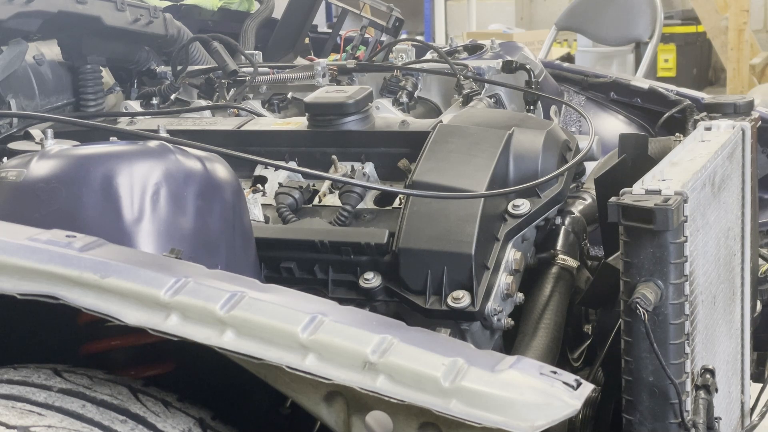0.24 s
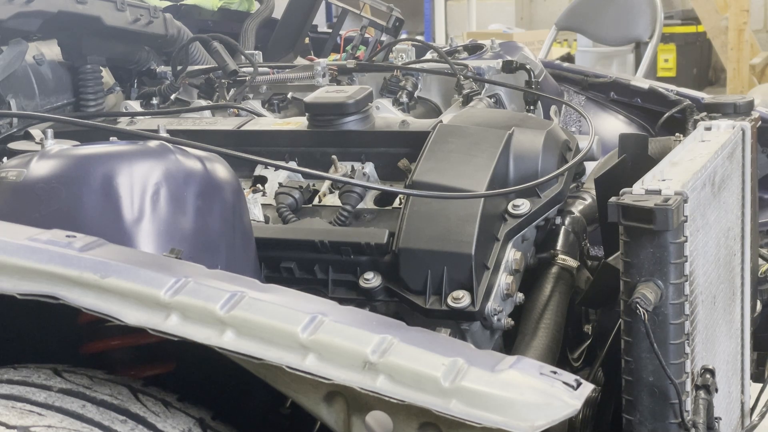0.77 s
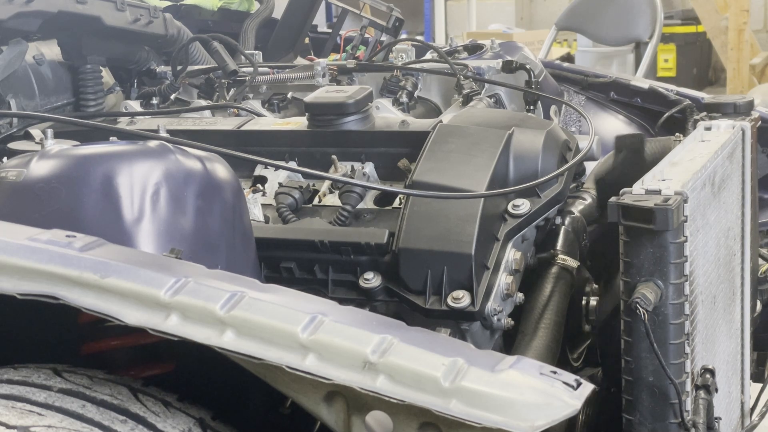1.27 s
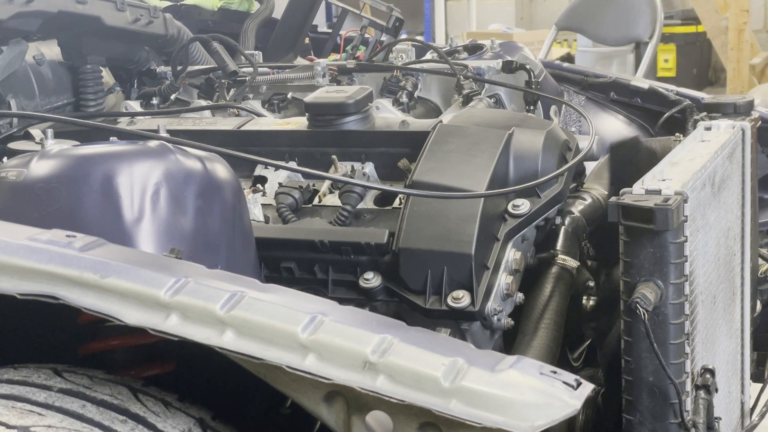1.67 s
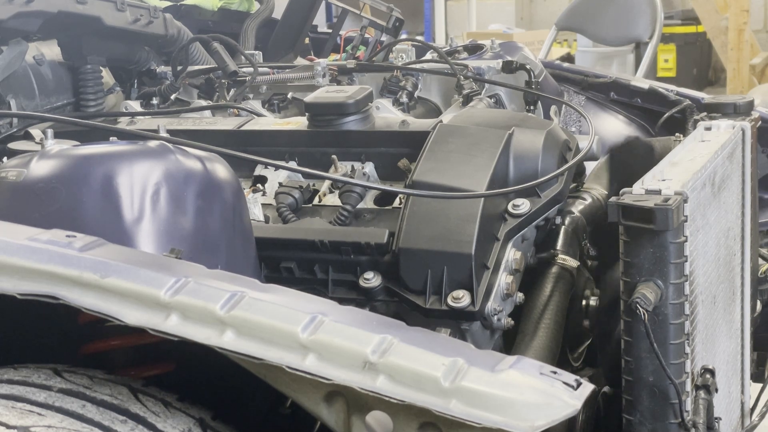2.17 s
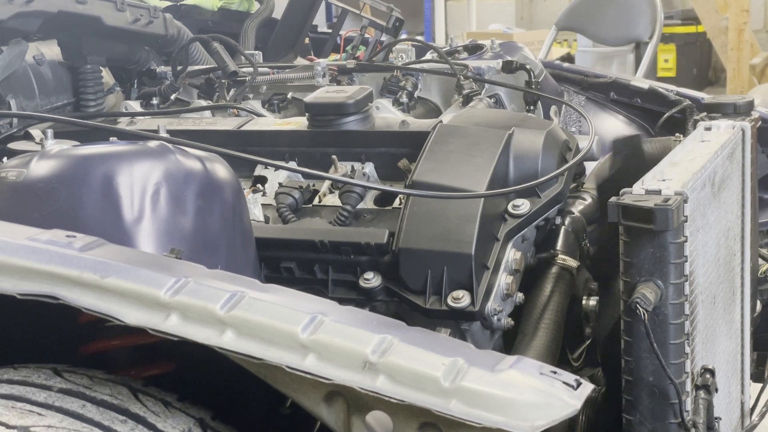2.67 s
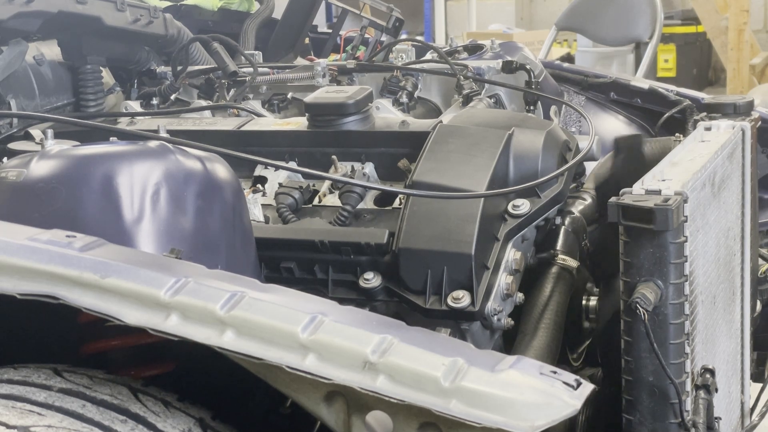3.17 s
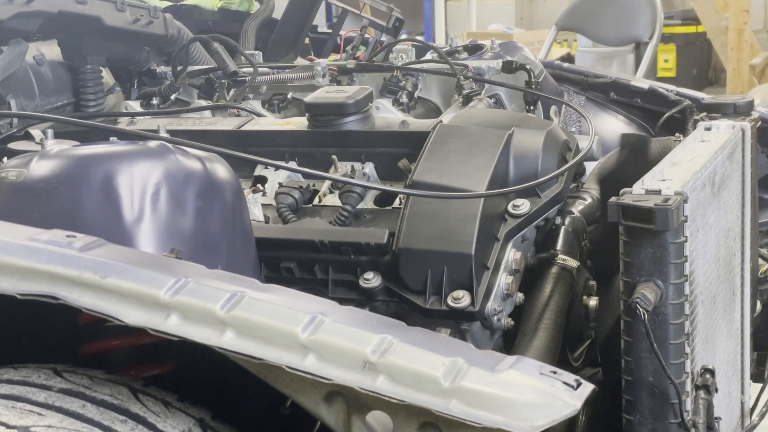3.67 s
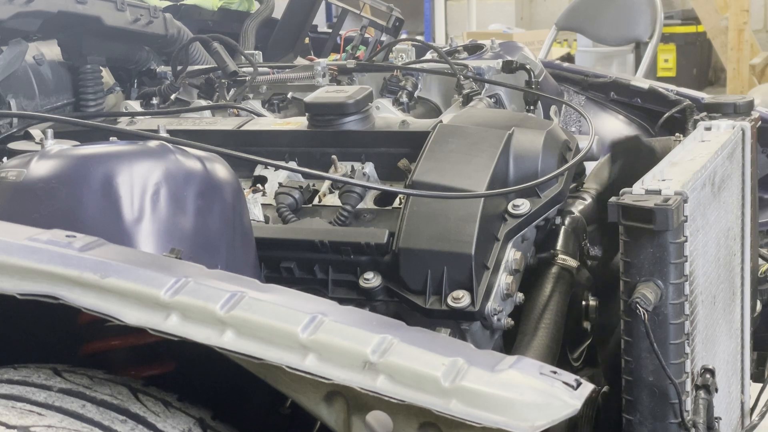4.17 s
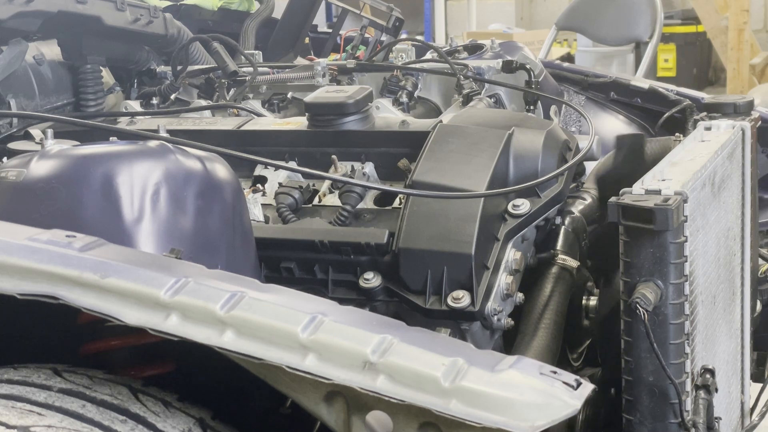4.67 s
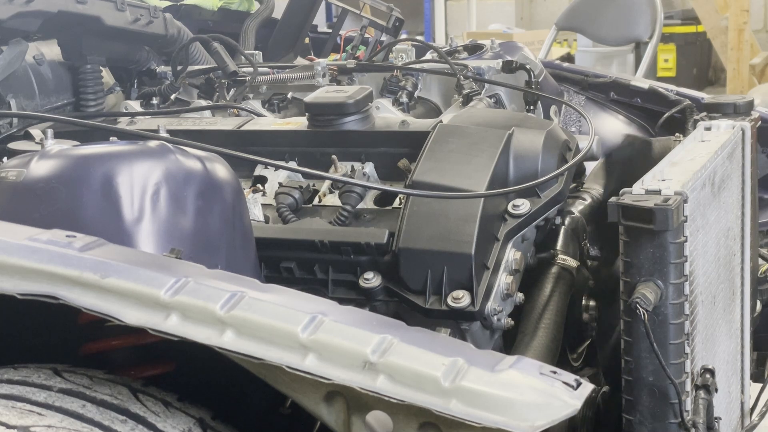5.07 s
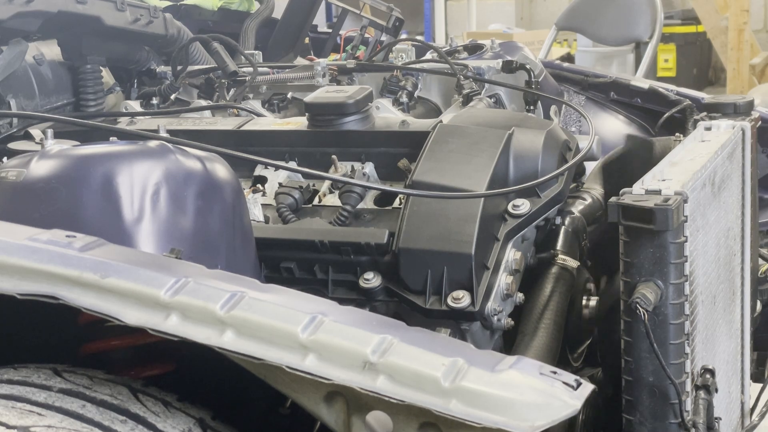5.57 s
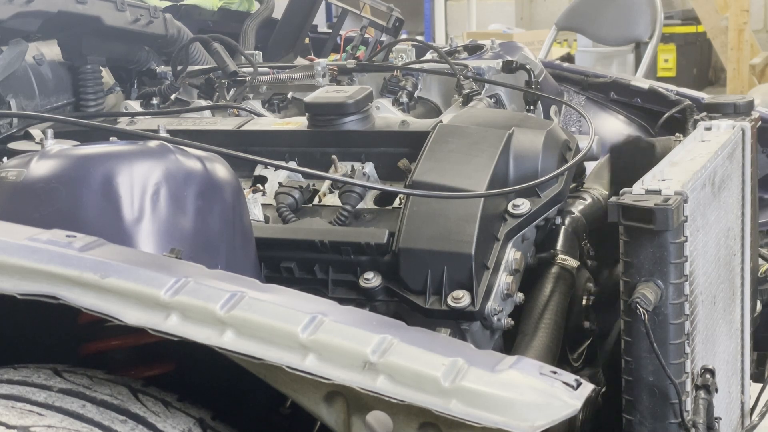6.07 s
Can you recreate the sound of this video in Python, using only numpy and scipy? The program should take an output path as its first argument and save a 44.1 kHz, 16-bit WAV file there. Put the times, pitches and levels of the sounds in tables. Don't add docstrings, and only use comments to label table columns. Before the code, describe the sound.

A fuel pump whirrs down, then a starter clunks in and cranks a car engine that never fires, with booming pulses and hollow metallic knocks.

```python
import sys
import numpy as np
from scipy import signal
from scipy.fft import rfft, irfft, next_fast_len
from scipy.io import wavfile
from scipy.ndimage import uniform_filter1d

SR = 44100
rng = np.random.default_rng(int(sys.argv[2]) if len(sys.argv) > 2 else 0)


def gain_from_decibels(decibels):
    exponent = np.asarray(decibels, float) / 20
    return 10 ** exponent


def to_wav(sig):
    pcm = np.clip(np.atleast_2d(sig), -1, 1) * 32767
    pcm = np.round(pcm).astype(np.int16)
    wavfile.write(sys.argv[1], SR, pcm.T)


N = 279153
T = np.arange(N) / SR
PADDED = next_fast_len(N + SR // 4)


def in_time(rows):
    s, *columns = np.transpose(rows)
    return [np.interp(T, s, c) for c in columns]


def rms_one(x):
    return x / np.sqrt(np.mean(x ** 2) + 1e-20)


def along_hz(points, size):
    hz = np.maximum(np.arange(size // 2 + 1) * SR / size, 1)
    point_hz, values = np.transpose(points)
    return np.interp(np.log(hz), np.log(np.maximum(point_hz, 1)), values)


def colour(x, points):
    return irfft(rfft(x, PADDED) * gain_from_decibels(along_hz(points, PADDED)), PADDED)[:N]


def drift(rate_hz):
    r = np.exp(-2 * np.pi * rate_hz / SR)
    return rms_one(signal.lfilter([1], [1, -2 * r, r * r], rng.standard_normal(N + SR))[SR:])


def resonate(x, hz, width_hz):
    r = np.exp(-np.pi * width_hz / SR)
    poles = [1, -2 * r * np.cos(2 * np.pi * hz / SR), r * r]
    return signal.lfilter(np.array([1, 0, -1]) * (1 - r * r) / 2, poles, x)


def band(x, low_hz, high_hz):
    return rms_one(signal.sosfilt(signal.butter(2, [low_hz, high_hz], "band", fs=SR, output="sos"), x))


def highpass(x, order, hz):
    return signal.sosfilt(signal.butter(order, hz, "high", fs=SR, output="sos"), x)


def pump_fade():
    off_s, t60_s = .25, .38
    return gain_from_decibels(-60 * np.maximum(T - off_s, 0) / t60_s)


def thud_swell(age_s):
    return np.minimum(age_s / .035, 1)


THUD_S = .206
AIR_DB, PUMP_AIR_DB, AIR_STIRRED_DB, AIR_RUNNING_DB = -68.5, -58, -52.5, -42
STIR_S = .15


def garage_air():
    rumble = gain_from_decibels(-62.5) * band(rng.standard_normal(N), 49, 95)
    age = np.maximum(T - THUD_S, 0)
    stirred = gain_from_decibels(AIR_STIRRED_DB) * thud_swell(age) * np.exp(-(age / STIR_S) ** 2)
    running = gain_from_decibels(AIR_RUNNING_DB) * (T > PINION_S)
    level = gain_from_decibels(AIR_DB) + gain_from_decibels(PUMP_AIR_DB) * pump_fade() + stirred + running
    return rumble + level * band(np.cumsum(rng.standard_normal(N)), 95, 1500)


# (frequency [Hz], width [Hz], level [dB])
PUMP_MODES = [(1250, 340, -16), (1820, 200, -12), (2860, 360, -8), (4150, 1100, -18), (6550, 380, -16)]
PUMP_DB, HISS_DB = -58.5, -83


def fuel_pump():
    flow = rng.standard_normal(N)
    whirr = sum(gain_from_decibels(db) * resonate(flow, hz, width) for hz, width, db in PUMP_MODES)
    whirr = whirr + .086 * colour(flow, SLAM_COLOUR)
    level = gain_from_decibels(PUMP_DB) * pump_fade() + gain_from_decibels(HISS_DB)
    return level * gain_from_decibels(1.4 * drift(30)) * rms_one(whirr)


def key_tick():
    start_s, level_db, t60_s = .189, -50, .17
    fade = gain_from_decibels(level_db - 60 * np.maximum(T - start_s, 0) / t60_s) * (T > start_s)
    return fade * band(rng.standard_normal(N), 4000, 16000)


# (frequency [Hz], level [dB], t60 [s])
THUD_MODES = [(82, -35, 0.62), (115, -25, 0.082), (174, -33, 0.21), (262, -37, 0.19), (330, -53, .12),
              (570, -58, .1), (620, -53, 0.36)]


def thud():
    age = np.maximum(T - THUD_S, 0)
    modes = sum(gain_from_decibels(db - 60 * age / t60) * np.sin(2 * np.pi * hz * age) for hz, db, t60 in THUD_MODES)
    return thud_swell(age) * modes


# (time [s], level [dB], t60 [s])
SLAM = [
    (1.066, -50.5, 0.35),
    (1.1075, -9, 0.044),
    (1.109, -16.5, 0.54),
    (.191, -66, .06),
]
PINION_S = SLAM[1][0]
# (frequency [Hz], level [dB])
SLAM_COLOUR = [(40, -55), (100, -19), (400, -1.5), (1400, -2), (2700, 3.5), (5500, -8.5), (8000, -0.5),
               (12000, -6.5), (16000, -11)]
# (frequency [Hz], width [Hz], level [dB])
SLAM_RING = [(1380, 120, 16), (2500, 200, 2), (3400, 160, -11), (5600, 800, 5.5)]


def engagement():
    burst = 0
    for s, level_db, t60 in SLAM:
        attack = np.clip((T - s) / .003, 0, 1)
        burst = burst + gain_from_decibels(level_db - 60 * np.maximum(T - s, 0) / t60) * attack
    crash = highpass(burst * rms_one(colour(rng.standard_normal(N), SLAM_COLOUR)), 2, 120)
    return crash + sum(gain_from_decibels(db) * resonate(crash, hz, width) for hz, width, db in SLAM_RING)


def belts():
    return gain_from_decibels(-40) * (T > PINION_S) * band(rng.standard_normal(N), 5600, 16000)


TURNS = [1.182, 1.675, 2.085, 2.485, 2.878, 3.281, 3.69, 4.105, 4.512, 4.955, 5.38, 5.83, 6.29]
# (time [s], drive [dB], effort [dB], tooth rate [Hz])
STARTER = [(1.2, -36.5, -0.5, 301.8), (1.27, -28, 1, 301.5), (1.4, -25.5, -7, 300), (1.52, -30, 0, 238.2),
           (1.66, -28, -0.5, 278.9), (2.25, -27, -1, 268.6), (2.5, -28, 0, 281.6), (3.4, -29, 1, 278.7),
           (3.95, -29, 1, 261), (4.7, -27.5, -0.54, 256.3), (5.4, -28, -1, 245.6),
           (5.85, -30.5, 0.7, 251.6), (6.05, -20.5, -9, 266), (6.17, -29, -9, 278),
           (6.33, -41.5, -16.5, 250)]
# (effort [dB], speed [ratio])
CYLINDERS = [(-0.24, 1.002), (-0.52, .99), (-0.33, .995), (-0.27, 1.015), (-0.55, 1.005), (-0.3, .99)]


def crank():
    strokes = 3 * np.interp(T, TURNS, np.arange(len(TURNS)))
    drive_db, effort_db, tooth_hz = in_time(STARTER)
    cylinder = np.round(strokes).astype(int) % len(CYLINDERS)
    own_db, speed = uniform_filter1d(np.array(CYLINDERS)[cylinder].T, size=SR // 30, axis=1)
    return 2 * np.pi * strokes, drive_db, effort_db + own_db, tooth_hz * speed


SAG = .115
# (order of tooth rate, level [dB rms])
WHINE = [(1, -34.5), (2, -27), (3, -37), (4, -38), (5, -39), (6, -45), (8, -34), (11, -47)]
# (frequency [Hz], width [Hz], level [dB])
HOUSING = [(166.5, 21, -43.5), (250, 87, -34.5), (441.3, 15, -38), (567, 20, -34), (748.4, 28, -31.5),
           (872.5, 42, -32), (1089, 29, -37), (1532, 7.5, -39.5), (1579, 5.4, -44), (2077, 18, -39.5),
           (2208, 21, -39), (2786, 16, -40), (3160, 20, -43), (4000, 37, -48), (4400, 43, -72),
           (5460, 260, -45), (11300, 340, -55)]
# (frequency [Hz], density [dB per Hz])
HASH = [(70, -98), (100, -33.5), (130, -67.5), (250, -53), (500, -61), (800, -59), (1300, -60.5),
        (2000, -64), (3200, -65), (5000, -68.5), (7000, -72), (9000, -72), (12000, -77), (15500, -83)]


def starter():
    angle, drive_db, effort_db, mean_hz = crank()
    drive = gain_from_decibels(drive_db + 31) * (T > PINION_S)
    load = np.exp(1.02 * (np.cos(angle - .15) - 1))
    tooth_hz = mean_hz * (1 - SAG * np.sin(angle - .3)) * (1 + .003 * drift(25))
    mesh = 2 * np.pi * np.cumsum(tooth_hz) / SR

    whine = 0
    for order, level_db in WHINE:
        whine = whine + gain_from_decibels(level_db + 1.5 * drift(14)) * np.sin(order * mesh + .4 * drift(45))
    whine = 2.2 * whine * load * gain_from_decibels(2.6 * effort_db)
    heard = colour(whine, [(200, 2), (1300, .5), (1800, -17.5), (2150, 7.5), (2350, 2), (2700, -4)])

    teeth = np.diff(np.floor(mesh / (2 * np.pi)), prepend=0) * gain_from_decibels(5.2 * rng.standard_normal(N))
    blows = rms_one(teeth) * .52 + rng.standard_normal(N)
    blows = blows * (.38 + np.exp(1.1 * (np.cos(angle - .3) - 1))) * gain_from_decibels(effort_db)
    housing, flare = 0, 0
    for hz, width, level_db in HOUSING:
        housing = housing + gain_from_decibels(level_db + 1.5 * drift(12)) * rms_one(resonate(blows, hz, width))
        flare = flare + gain_from_decibels(level_db / 2 + 12) * resonate(whine, hz, width)

    grit = rng.standard_normal(N) * gain_from_decibels(1.55 * drift(200) + 1.18 * drift(4.9))
    stroke_db = 1.6 * np.cos(angle + .3) + .6 * effort_db
    brush_hash = colour(grit, HASH) * np.sqrt(SR / 2) * gain_from_decibels(stroke_db)
    return drive * (.7 * heard + flare + housing + brush_hash)


# (start [s], end [s], level [dB rms], first frequency [Hz])
SONGS = [
    (1.245, 1.41, -25, 803),
    (1.49, 1.6, -23, 770),
    (4.78, 6.13, -29, 888),
]
CASING_HZ, SETTLE_S, FADE_DB_PER_S = 895, .04, 200


def casing():
    out, waver = 0, 1 + .0198 * drift(19.5)
    for start_s, end_s, level_db, first_hz in SONGS:
        settling = np.exp(-(np.maximum(T - start_s, 0) / SETTLE_S) ** 2)
        hz = CASING_HZ + (first_hz - CASING_HZ) * settling
        outside_s = np.maximum(np.maximum(start_s - T, T - end_s), 0)
        tone = np.sin(2 * np.pi * np.cumsum(hz * waver) / SR)
        out = out + gain_from_decibels(level_db - FADE_DB_PER_S * outside_s) * tone
    return gain_from_decibels(-5) * np.sqrt(2) * gain_from_decibels(6 * drift(54)) * out * (T > PINION_S)


def puff(age, rise_s, t60):
    rise = np.sin(np.pi / 2 * np.clip(age / rise_s, 0, 1)) ** 2
    return rise * gain_from_decibels(-60 * np.maximum(age - rise_s, 0) / t60)


RING_SHARE = [.55, 1.05, .22]
CLOSING_S = .05
RESTING_GLIDE = .4


def booms(mode, puffs):
    start_hz, end_hz, bend, second_share, rise_s, t60 = mode
    age = T[:SR // 2]
    out = np.zeros(N + SR)
    lengths = np.diff(puffs[:, 0], append=puffs[-1, 0] + .3)
    for k, (s, first_db, second_db) in enumerate(puffs):
        depth = 1 if 0 < k < len(puffs) - 1 else RESTING_GLIDE
        left_to_rise = 1 - np.minimum(age / lengths[k], 1) ** bend
        hz = end_hz - depth * (end_hz - start_hz) * left_to_rise
        first = gain_from_decibels(first_db) * puff(age, rise_s, t60)
        second_age = age - second_share * min(lengths[k], .3)
        second = gain_from_decibels(second_db) * puff(second_age, rise_s, t60 * RING_SHARE[k % 3])
        closing = np.clip((lengths[k] - age) / CLOSING_S + 1, 0, 1)
        tone = np.sin(2 * np.pi * np.cumsum(hz) / SR)
        out[int((s - .01) * SR):][:len(age)] += np.hypot(first, second) * closing * tone
    return np.sqrt(2) * gain_from_decibels(1.2 * drift(20)) * out[:N]


# (time [s], low mode first [dB], second [dB], high mode first [dB], second [dB])
BOOMS = [(1.283, -14, -34, -19.5, -34), (1.485, -5, -6.5, -26, -19), (1.77, -8, -13, -17, -10),
         (2.04, -8.5, -8, -8.5, -19), (2.31, -9, -7, -8, -18.5), (2.569, -6, -7.5, -19, -16),
         (2.831, -6.5, -10, -11.5, -15), (3.11, -12, -6.5, -8, -24), (3.371, -7, -7, -12, -7.5),
         (3.63, -5.5, -5, -13.5, -16), (3.92, -7.5, -10, -16, -20.5), (4.189, -8.5, -4, -13.5, -23),
         (4.46, -8.5, -10.5, -11.5, -11.5), (4.74, -9.5, -14.5, -13, -17), (5.03, -7, -9.5, -19, -10),
         (5.31, -4.5, -7.5, -18, -15.5), (5.63, -13, -8, -12.5, -21), (5.92, -8, -7, -15, -20),
         (6.179, -15, -28, -34, -37)]
# (start [Hz], end [Hz], glide bend [exponent], second puff [share of boom], rise [s], t60 [s])
PIPE_LOW_MODE = (59.5, 75, 1.9, .45, .055, .95)
PIPE_HIGH_MODE = (82, 108, .55, .38, .07, .5)


def exhaust():
    rows = np.array(BOOMS)
    pipe = booms(PIPE_LOW_MODE, rows[:, [0, 1, 2]]) + booms(PIPE_HIGH_MODE, rows[:, [0, 3, 4]])
    return highpass(pipe, 3, 40)


# (time [s], peak [dB], frequency [Hz])
KNOCKS = [
    (1.6935, -12.5, 1303),
    (2.1017, -8.5, 1292),
    (2.497, -5, 1310),
    (2.8913, -8.5, 1300),
    (3.293, -4.5, 1330),
    (3.6967, -15, 1310),
    (4.1125, -6.5, 1315),
    (4.9545, -10.5, 1298),
    (5.844, -17, 1311),
]


def knocks():
    out, rattle = 0, 1 + .3 * drift(250)
    for s, peak_db, hz in KNOCKS:
        age = np.clip(T - s + .007, 0, .2)
        shape = (age / .008 * np.exp(1 - age / .0094)) ** 2
        tones = np.sin(2 * np.pi * hz * age) + .85 * np.sin(2 * np.pi * 1.06 * hz * age)
        out = out + gain_from_decibels(peak_db - 6) * rattle * shape * tones
    return out


# (frequency [Hz], left lead [rad])
PORT_PHASE = [(20, .15), (520, .3), (1380, 0), (3190, .5), (5170, .6), (5770, -1.2), (6800, -.8),
              (7490, -1.9), (8300, -2.4), (8650, -3.14), (8950, -3.14), (9300, -3.45), (9800, -3.9),
              (12100, -5.2), (12600, -5.9), (15800, -6.3)]
# (frequency [Hz], left minus right [dB])
PORT_LEAN = [(60, -.7), (350, -.6), (700, -2.8), (1400, 1.2), (2500, 0)]
# (frequency [Hz], level [dB])
DIFFUSE = [(60, -24), (200, -19), (640, -5), (1300, -10), (2400, -18), (4400, -16), (7000, -13),
           (8400, -30), (9500, -30), (12000, -11)]


def scene():
    direct = garage_air() + fuel_pump() + key_tick() + thud() + engagement() + belts()
    direct = direct + starter() + casing() + exhaust() + knocks()
    tail = rng.standard_normal(SR // 4) * gain_from_decibels(-60 * T[:SR // 4] / .16)
    walls = colour(signal.fftconvolve(direct, tail / np.linalg.norm(tail))[:N], DIFFUSE)
    turn = np.exp(.5j * along_hz(PORT_PHASE, PADDED)) * gain_from_decibels(.5 * along_hz(PORT_LEAN, PADDED))
    spectrum = rfft(direct, PADDED)
    left = irfft(spectrum * turn, PADDED)[:N] + walls
    right = irfft(spectrum / turn, PADDED)[:N] - walls
    return np.array([left, right])


def top_cut(x):
    return signal.sosfilt(signal.butter(12, 16200, fs=SR, output="sos"), x)


def record(dry):
    cut = signal.sosfilt(signal.ellip(10, .5, 60, 15800, fs=SR, output="sos"), dry)
    rounded = np.clip(cut / (1 + np.abs(cut / 1.15) ** 4) ** .25, -1, 1)
    return top_cut(rounded)


dry = scene()
out = record(dry)
to_wav(out)
```